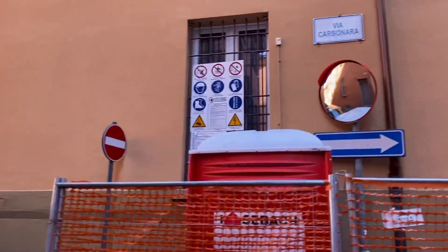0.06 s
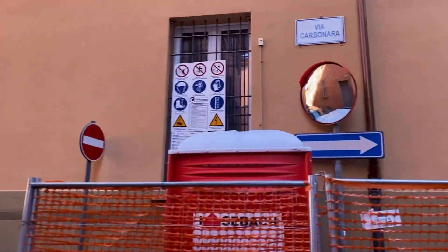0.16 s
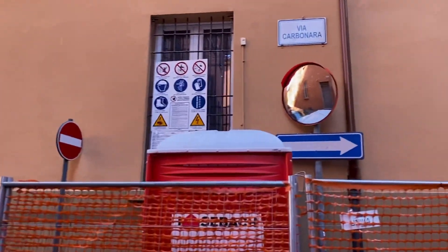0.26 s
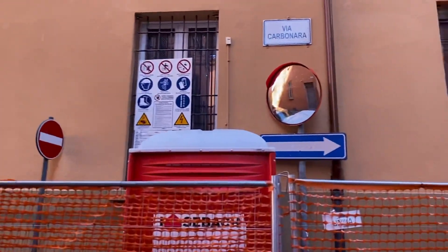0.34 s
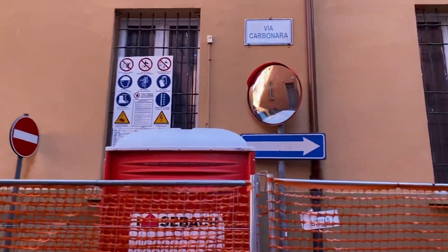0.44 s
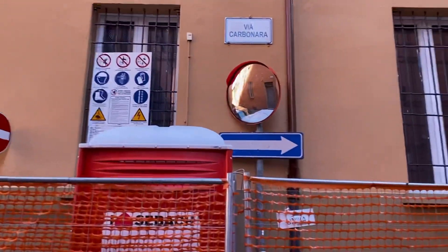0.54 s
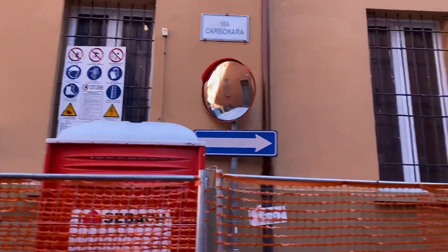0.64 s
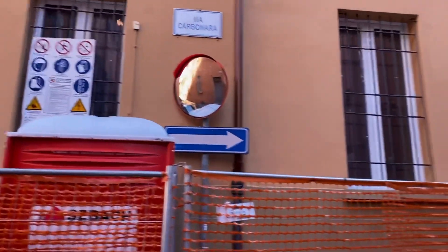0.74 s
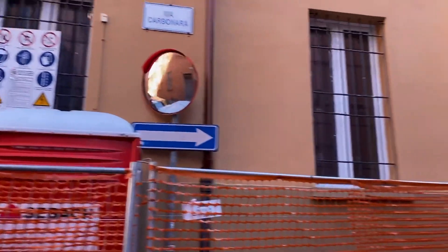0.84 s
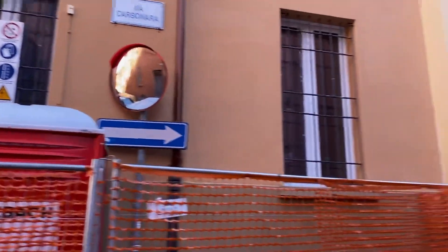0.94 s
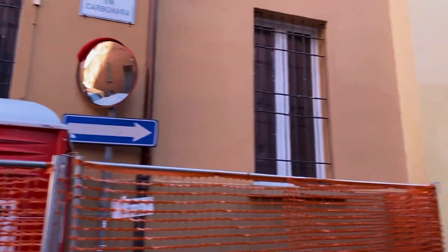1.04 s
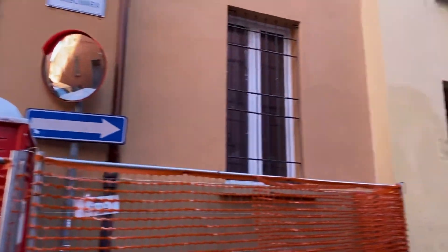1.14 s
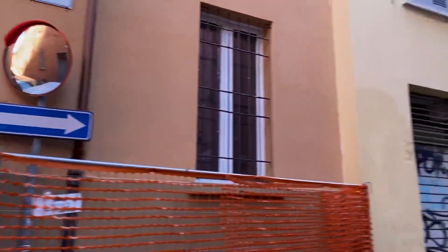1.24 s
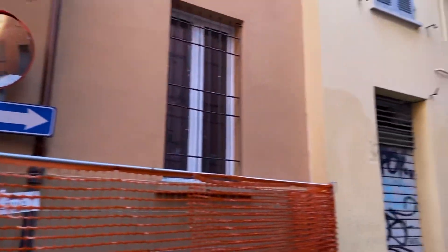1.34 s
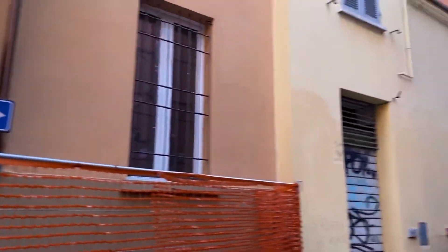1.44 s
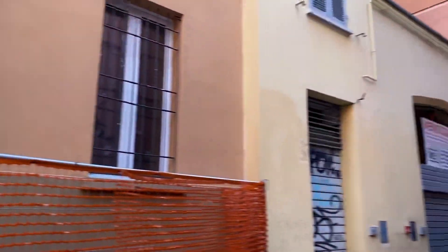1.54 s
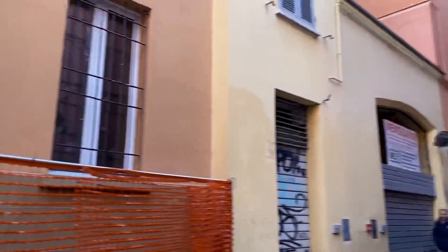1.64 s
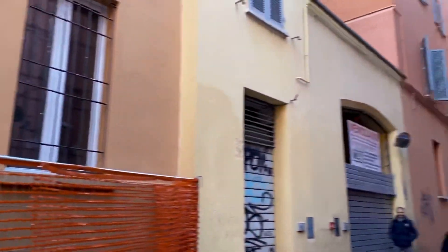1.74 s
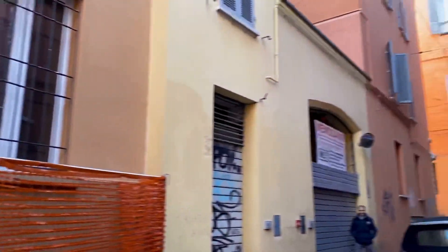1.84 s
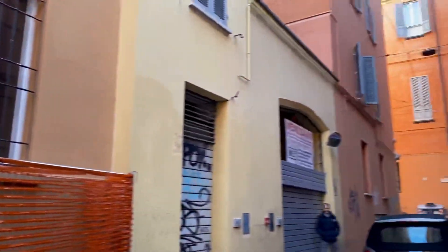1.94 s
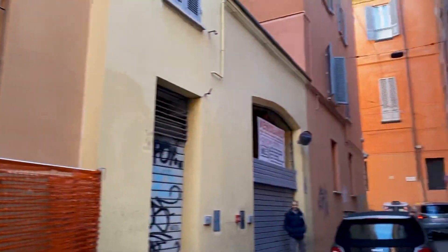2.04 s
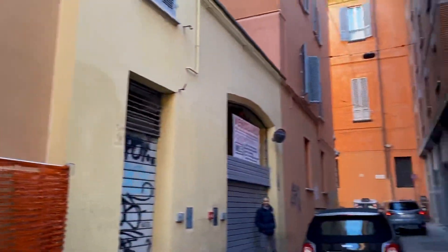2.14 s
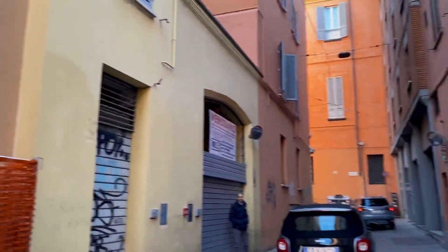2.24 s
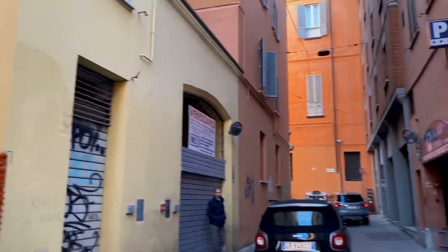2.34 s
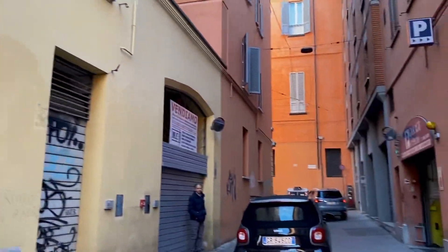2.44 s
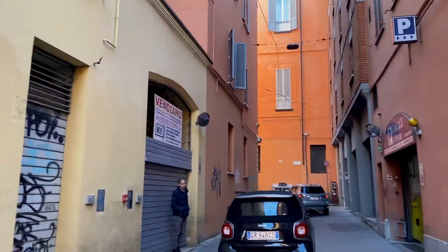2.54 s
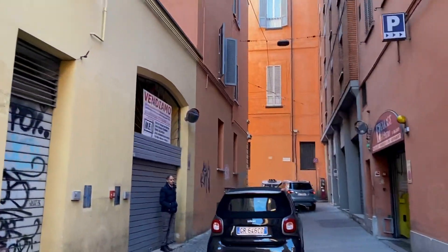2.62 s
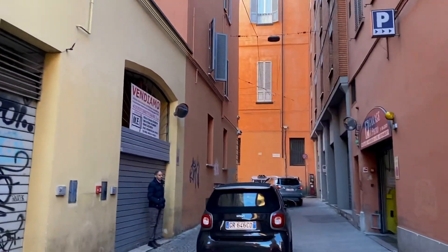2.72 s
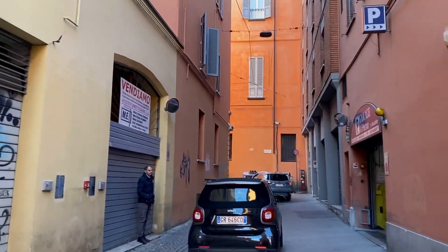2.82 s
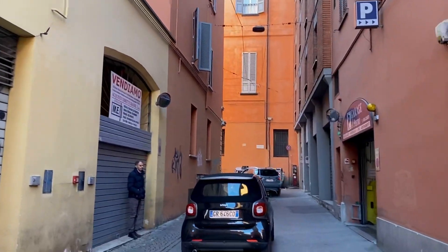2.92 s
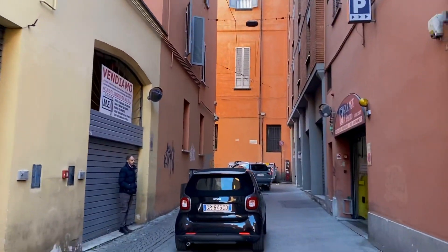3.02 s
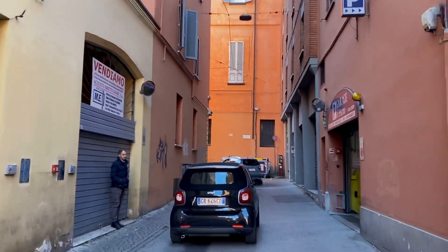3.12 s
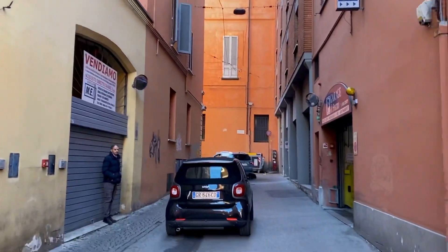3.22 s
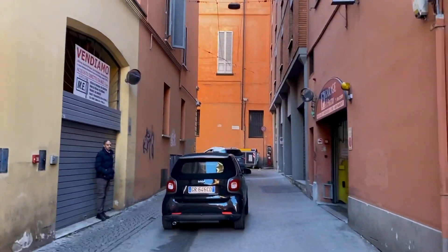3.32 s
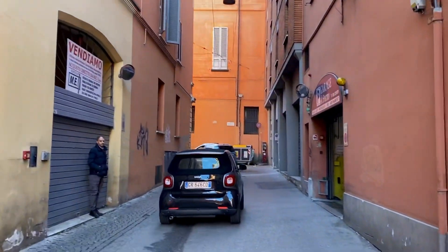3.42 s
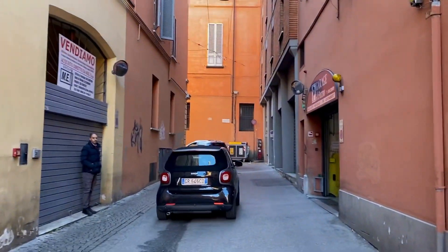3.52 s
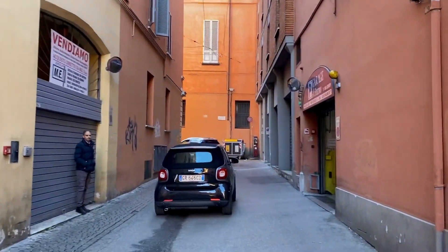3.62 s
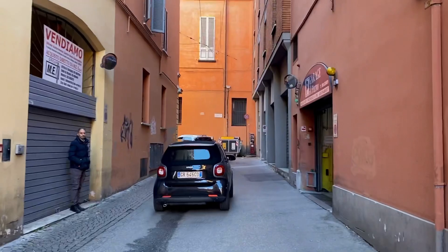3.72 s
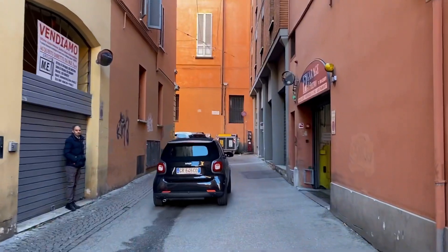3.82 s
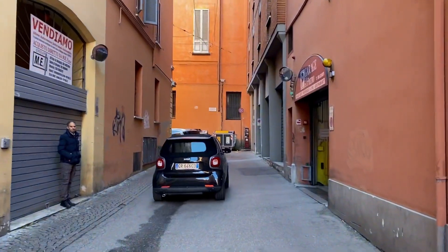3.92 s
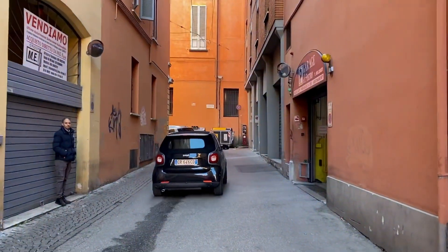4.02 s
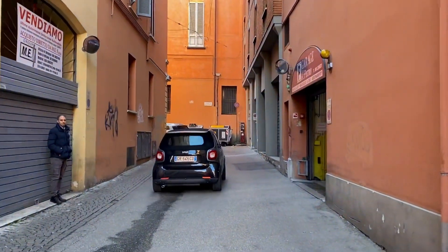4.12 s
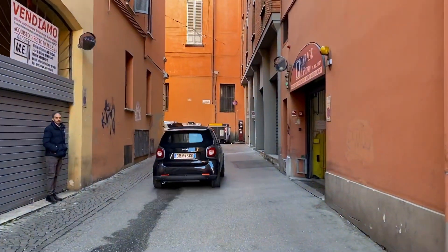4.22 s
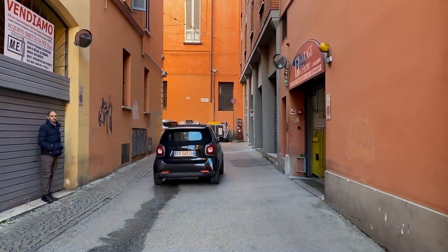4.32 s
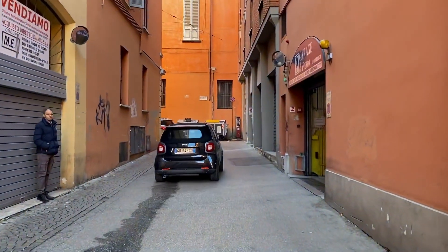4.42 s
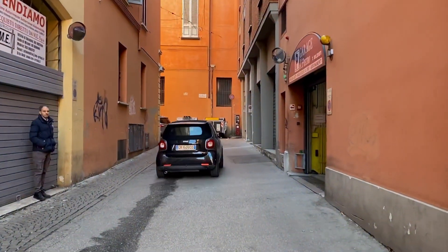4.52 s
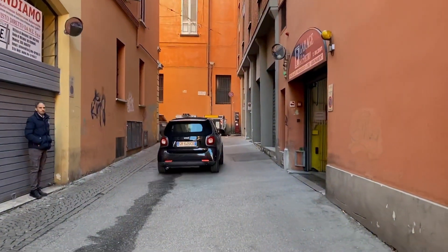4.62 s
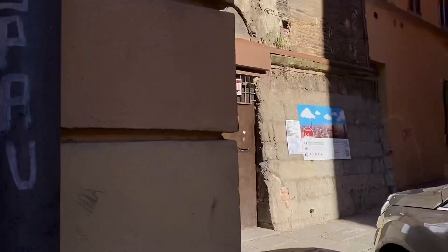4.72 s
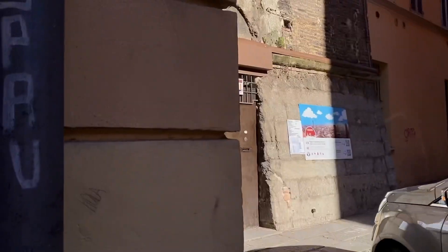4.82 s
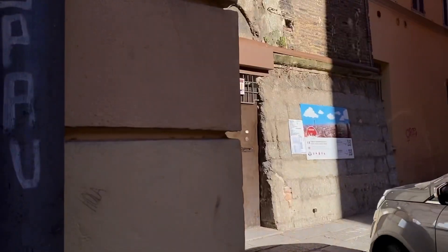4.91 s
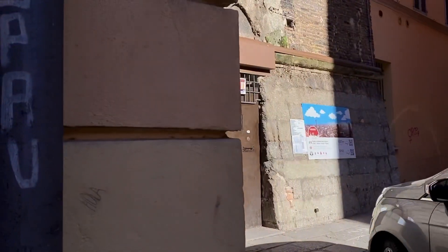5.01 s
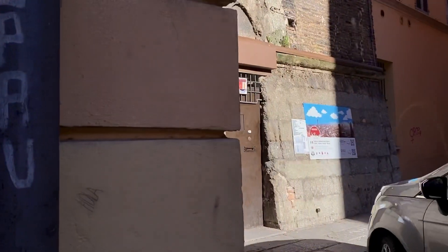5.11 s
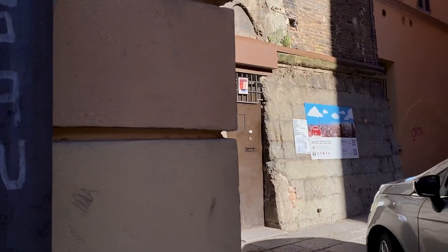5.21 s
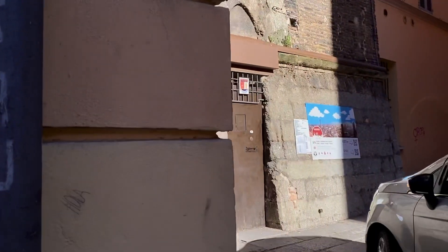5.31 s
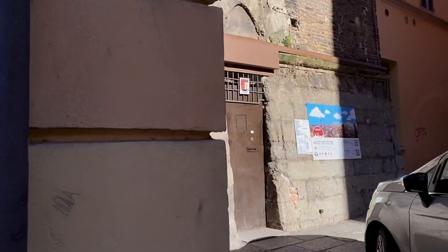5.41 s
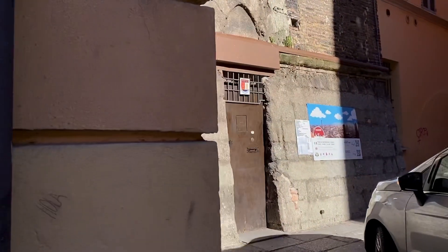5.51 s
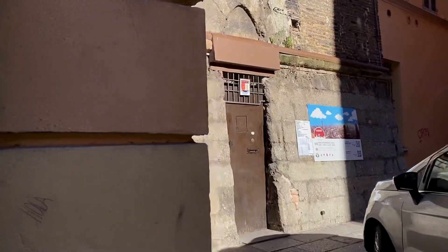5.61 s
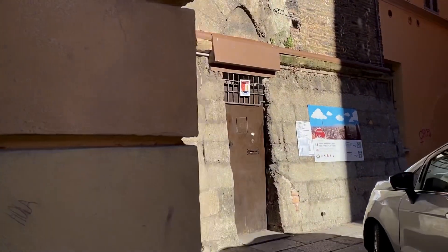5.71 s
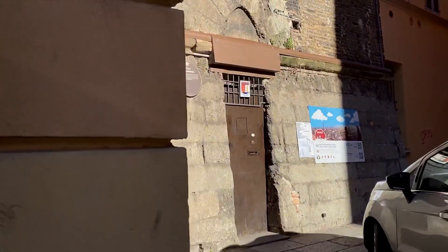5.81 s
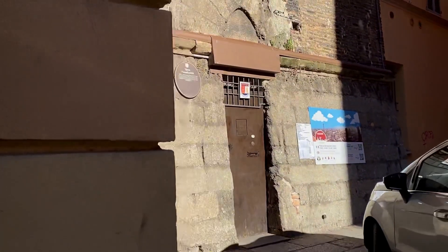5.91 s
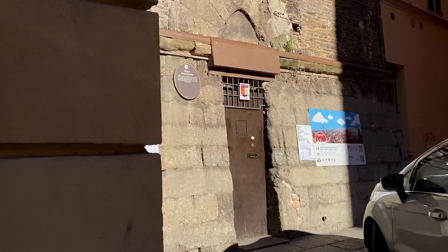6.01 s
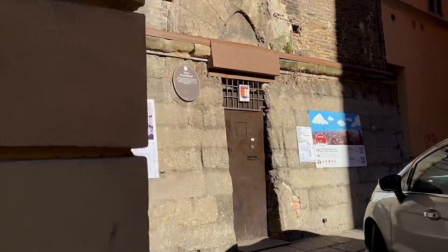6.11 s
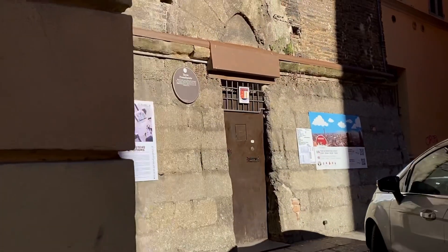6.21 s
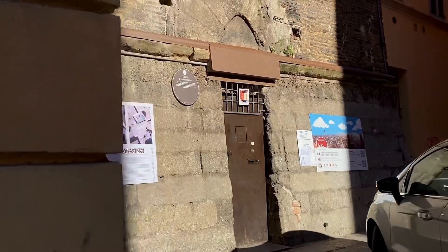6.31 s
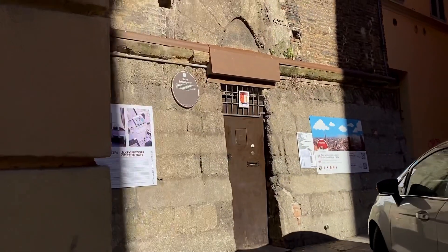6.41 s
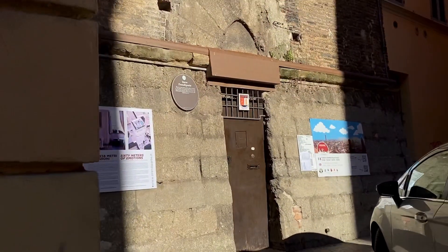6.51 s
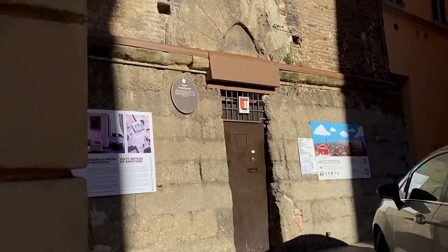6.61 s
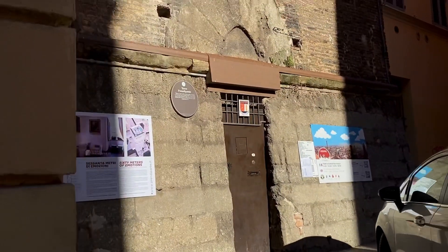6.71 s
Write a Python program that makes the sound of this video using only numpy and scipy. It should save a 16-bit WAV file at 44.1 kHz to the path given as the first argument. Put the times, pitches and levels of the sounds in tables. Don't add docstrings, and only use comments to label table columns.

```python
import sys
import numpy as np
from scipy import signal
from scipy.fft import rfft, irfft, next_fast_len
from scipy.io import wavfile
from scipy.ndimage import uniform_filter1d

SR = 44100
rng = np.random.default_rng(int(sys.argv[2]) if len(sys.argv) > 2 else 0)


def gain_from_decibels(decibels):
    exponent = np.asarray(decibels, float) / 20
    return 10 ** exponent


def wrap_up_sound(samples):
    columns = np.atleast_2d(samples).T
    tamed = np.clip(columns, -1, 1)
    steps = np.round(tamed * 32767).astype(np.int16)
    wavfile.write(sys.argv[1], SR, steps)


N = 297675
t = np.arange(N) / SR
BOTH_SIDES = np.array([[1], [-1]])

CUT_S, FADE_OUT_S, FADE_IN_S = 4.748, 0.0054, 0.013
MEAN_LOAD_DB, LOAD_LAG_S = -30, 0.4

# (time [s], firing cycle [Hz], load as level of order 2 [dB])
LANE_ENGINE = [(0.0, 23.13, -35), (0.24, 22.66, -50), (0.4, 22.3, -35.5), (0.61, 21.53, -32.5),
               (0.73, 22.27, -37), (1.24, 24.2, -31.5), (1.53, 27.15, -27.5), (1.8, 32.02, -24),
               (1.95, 34.63, -25), (2.14, 35.37, -24.5), (2.87, 35.03, -25), (3.17, 36.13, -24.5),
               (3.49, 35.99, -21), (3.7, 36.44, -27.5), (4.15, 40.84, -33), (4.35, 41.98, -41.5),
               (4.55, 43.27, -45), (4.75, 41.06, -55)]
CORNER_ENGINE = [(4.751, 41.36, -33.5), (4.94, 39.17, -33.5), (5.11, 36.6, -40.5), (5.281, 34.37, -29),
                 (5.501, 31.4, -36.5), (5.711, 25.58, -32), (5.94, 22.77, -38), (6.2, 21.53, -42.5),
                 (6.75, 22.29, -52.5)]
# (multiple of cycle, level [dB], share of load swing, gain as the pipe tunes in [dB/Hz])
LANE_STRONG = [(1, -36, -0.055, 0.69), (2, -30, 1.0, 0.0), (4, -51.5, 0.53, -0.1)]
CORNER_STRONG = [(2, -30.5, 1, 0.43), (3, -34.5, 0.73, -0.013), (4, -38, 0.81, -0.46)]
# (multiple of cycle, level over the street drone [dB])
LANE_WEAK = [(3, -13), (5, -15.5), (6, -12), (7, -15), (8, -17), (11, -24)]
CORNER_WEAK = [(1, -14), (5, -17.5), (6, -16.5), (7, -13.5)]
# (time [s], peak level [dB], end pitch [Hz], length [s])
KNOCKS = [
    (3.3305, -22, 250, .0075),
    (4.0305, -18, 290, .0072),
    (4.7043, -21, 290, .0095),
    (4.8712, -15, 200, .005),
]
# (pitch [Hz], level [dB], time to fall 60 dB [s], delay [s])
COVER_RINGS = [
    (84.5, -3.5, 0.2, .008),
    (164, 0, 0.075, .006),
    (517, 0, .12, 0.0033),
    (734, -6, 0.021, 0.0066),
]
# (delay [s], level [dB])
WALL_ECHOES = [
    (0.0137, -4),
    (.020, -11),
    (.032, -11),
    (0.063, -20),
]
# (time [s], peak level [dB])
LOUD_TICKS = [(2.4399, -52), (2.9216, -45), (3.0072, -48), (3.205, -48), (3.4555, -52), (3.5369, -49),
              (3.6233, -46), (3.6758, -45), (3.8693, -48), (4.2446, -48), (4.3623, -47), (5.0976, -49),
              (5.1814, -50)]
# (start [s], end [s], start pitch [Hz], end pitch [Hz], level [dB])
WHINES = [(1.0, 1.55, 238, 272, -44), (1.0, 1.6, 340, 375, -47), (1.4, 3.2, 445, 432, -44),
          (3.5, 4.75, 434, 445, -44), (1.55, 1.75, 2310, 2300, -50), (1.88, 2.0, 2300, 2290, -47),
          (.6, 1.05, 2800, 2800, -60), (2.6, 3.08, 80, 104, -37), (0, 2.3, 1250, 1270, -59),
          (0, .25, 1010, 1010, -51), (6.25, 6.75, 935, 935, -53), (6.0, 6.75, 540, 510, -51),
          (1.35, 2.3, 1330, 1320, -53), (4.05, 4.7, 372, 385, -52), (-.3, 1.2, 94, 89, -42),
          (3.45, 3.7, 2340, 2320, -53), (2.0, 3.0, 392, 385, -52)]
# (start [s], end [s], start pitch [Hz], end pitch [Hz], level [dB])
SWELLS = [(0, 2.4, 4700, 4650, -57), (4.18, 4.4, 2300, 2330, -48), (5.05, 5.6, 2500, 2350, -45),
          (4.77, 5.4, 1400, 1300, -44), (4.76, 5.5, 4650, 4450, -52), (5.65, 6.25, 810, 720, -43),
          (5.4, 6.3, 250, 215, -43), (1.3, 1.9, 3020, 3050, -59)]
# (time [s], level [dB])
LANE_NEAR = [(0.0, -5), (0.9, -4), (1.3, -3.5), (1.65, -0.5), (1.92, 1), (2.6, 0.34), (3.9, 0.5), (4.27, 3),
             (4.4, 1.5), (4.75, 3)]
CORNER_NEAR = [(4.75, 5), (5.1, 3.5), (5.5, 3), (5.75, 0.5), (6.1, -3), (6.4, -4), (6.75, -5)]
# (level [dB], share of nearness, share of engine load)
LANE_LAYERS = [
    (-32, 0.26, 0.042),
    (-38.5, 1.32, 0.0038),
    (-43, 1.03, -0.028),
    (-60.5, 0.79, 0.17),
]
CORNER_LAYERS = [
    (-28, 0.45, .05),
    (-36, 0.77, .01),
    (-40, 1.08, .01),
    (-59.5, 0.63, 0.032),
]
# (low edge [Hz], high edge [Hz])
LAYER_BANDS = [
    (30, 120),
    (160, 600),
    (800, 5000),
    (9800, 12200),
]
# (pitch [Hz], level per Hz [dB])
LANE_COLOUR = [(22, -10), (35, 3), (90, -0.5), (250, 5.5), (450, 9), (700, 7.5), (1250, 8), (1900, 6),
               (2350, 2), (3700, -7), (4600, -9), (5600, -12), (7200, -19), (11500, -27.5), (15500, -32)]
CORNER_COLOUR = [(22, -24), (45, 5.5), (110, 9.5), (250, 8.5), (500, 9), (750, 8), (1250, 9), (2000, 7.5),
                 (2600, 2), (3300, -4.5), (4500, -7), (5800, -13.5), (7400, -20.5), (11500, -27.5),
                 (15500, -34.5)]
# (pitch [Hz], shared part [0-1], left lead [turns], left over right [dB])
LANE_LIKENESS = [(40, 0.94, 0.033, 0.5), (170, 0.92, 0, -3), (350, 0.68, 0.055, -0.5),
                 (680, 0.58, 0.16, 2.5), (1220, 0.48, 0.17, 0.5), (1650, 0.04, 0.55, 1.5),
                 (2260, 0.8, 0.85, 0.5), (2740, 0.22, 0.97, .4), (3480, 0.4, 1.15, 2.5),
                 (4300, 0.4, 0.92, 1.2), (5450, 0.2, 1.32, 3), (6400, 0.8, 1.04, 0), (6900, 1, 0.996, 0.5)]
CORNER_LIKENESS = [(40, 0.96, 0.0076, 0.22), (170, 0.9, 0.13, -1.6), (350, 0.35, 0.001, -0.34),
                   (680, 0.17, 0.12, 2.9), (1160, 0.31, 0.47, 0.37), (1690, 0.42, 0.66, -1.5),
                   (2300, 0.53, 0.93, -0.25), (2760, 0.51, 1.13, 0.77), (3060, 0.11, 1.22, 0.23),
                   (4000, 0.72, 1.15, 0.85), (5530, .05, 0.79, 1.2), (6360, 0.47, 1.03, .1),
                   (7100, 0.96, 1.01, 0)]


def in_time(rows):
    s, *columns = np.transpose(rows)
    return [np.interp(t, s, column) for column in columns]


def at_hz(points, hz):
    known_hz, level_db = np.transpose(points)
    return np.interp(np.log(hz + 1), np.log(known_hz), level_db)


def drift(rate, span=slice(None)):
    r = np.exp(-2 * np.pi * rate * 40 / SR)
    slow = signal.lfilter([1], [1, -2 * r, r * r], rng.standard_normal(N // 40 + 2002))
    slow = slow[2000:]
    return np.interp(t[span] * SR / 40, np.arange(len(slow)), slow / slow.std())


def engine(table, strong, weak, drone_db, wobble, flicker_db, surge_db, surge_per_s):
    cycle_hz, load_db = in_time(table)
    phase = 2 * np.pi * np.cumsum(cycle_hz) / SR
    levels = []
    for (multiple, db, share, slope), surge in zip(strong, surge_db):
        choked_db = 2.5 * np.clip(32 - multiple * cycle_hz, 0, None)
        level = db + share * (load_db - MEAN_LOAD_DB) + slope * (cycle_hz - 35)
        levels.append(level - choked_db + surge * drift(surge_per_s))
    levels += [drone_db + db for multiple, db in weak]
    multiples = [round(row[0]) for row in strong + weak]
    out = 0
    for multiple, db in zip(multiples, levels):
        rough = multiple / 2
        flicker = flicker_db * (rough * drift(6) + abs(rough - 1) * drift(1.2))
        angle = multiple * phase + wobble * rough * drift(3) + 6.3 * rng.random()
        out = out + gain_from_decibels(db + flicker) * np.sin(angle)
    return np.sqrt(2) * out, phase


def knocks():
    direct = np.zeros(N)
    for s, db, end_hz, length in KNOCKS:
        age = t[:round(length * SR)]
        hz = end_hz + 520 * np.exp(-age / 0.0017)
        shape = (age / length) ** 0.22 * np.clip((length - age) / 0.0015, 0, 1)
        chirp = gain_from_decibels(db) * shape * np.sin(2 * np.pi * np.cumsum(hz) / SR)
        direct[round(s * SR):][:len(age)] += chirp
    cover_s, cover_db = 4.8662, -16.5
    age = t[:SR // 2]
    for hz, db, t60, delay in COVER_RINGS:
        ring = gain_from_decibels(cover_db + db - 60 * age / t60) * np.sin(2 * np.pi * hz * age)
        ring = ring * (1 - np.exp(-age / 0.00077))
        direct[round((cover_s + delay) * SR):][:len(age)] += ring

    def late(delay):
        return np.interp(t - delay, t, direct)

    left = late(0.00022) + sum(gain_from_decibels(db) * late(s * 0.93) for s, db in WALL_ECHOES)
    right = gain_from_decibels(0.5) * direct + sum(gain_from_decibels(db) * late(s) for s, db in WALL_ECHOES)
    return np.array([left, right])


def ticks(phase, hiss_db):
    first_phase = phase[round(LOUD_TICKS[1][0] * SR)]
    fired = np.flatnonzero(np.diff(np.floor((phase - first_phase) / (2 * np.pi))))
    chance_db = 2.5 * (rng.exponential(size=len(fired)) - 1)
    starts = np.zeros(N)
    starts[fired] = gain_from_decibels(hiss_db[fired] + 4 + chance_db)
    for s, db in LOUD_TICKS:
        starts[round(s * SR)] = gain_from_decibels(db)
    age = t[:3000] / 0.006
    size = signal.fftconvolve(starts, age * np.exp(1 - age))[:N]
    bright = signal.butter(2, [11200, 13100], "band", fs=SR, output="sos")
    return signal.sosfilt(bright, size * rng.standard_normal(N))


def whines():
    out = np.zeros((2, N))
    rows = [(row, 0.7 * np.sqrt(row[2])) for row in WHINES]
    rows += [(row, 0.08 * row[2]) for row in SWELLS]
    for (start, end, start_hz, end_hz, db), width_hz in rows:
        span = (t >= start) & (t < end)
        share = (t[span] - start) / (end - start)
        phase = 2 * np.pi * np.cumsum(start_hz + (end_hz - start_hz) * share) / SR
        wander = (drift(width_hz, span) + 1j * drift(width_hz, span)) / np.sqrt(2)
        blur = 4 / np.sqrt(width_hz + 100) + wander
        swell = gain_from_decibels(db) * np.sqrt(np.sin(np.pi * share))
        angle = phase + np.pi * 0.15 * BOTH_SIDES
        out[:, span] += np.real(swell * blur * np.exp(1j * angle))
    return out


def layer_levels(near, table, layers):
    load = uniform_filter1d(in_time(table)[1], round(LOAD_LAG_S * SR)) - MEAN_LOAD_DB
    near_db = in_time(near)[0]
    return [db + near_share * near_db + load_share * load for db, near_share, load_share in layers]


def street(levels, colour, likeness, phase, span, patchy_db, throb_db, wall_share):
    n = span.stop - span.start
    size = next_fast_len(n)
    hz = np.fft.rfftfreq(size, 1 / SR)
    colour_db = at_hz(colour, hz)
    mid, side = rfft(rng.standard_normal((2, size))) * gain_from_decibels(colour_db)
    known_hz, *columns = np.transpose(likeness)
    alike, turns, pan_db = [np.interp(hz, known_hz, column) for column in columns]
    alike = np.clip(alike, 0, 0.995)
    pair = np.sqrt((1 + alike) / 2) * mid + np.sqrt((1 - alike) / 2) * side * BOTH_SIDES
    pair = pair * np.exp(1j * np.pi * turns * BOTH_SIDES) * gain_from_decibels(pan_db * BOTH_SIDES / 2)
    lags = rng.uniform(0.001998, 0.022, (10, 1))
    bounces = np.exp(-2j * np.pi * hz * lags).sum(axis=0)
    pair = pair * (1 + wall_share * bounces) / np.sqrt(1 + 10 * wall_share ** 2)
    power = gain_from_decibels(2 * colour_db) / len(hz)
    lifts = []
    for db, (low, high) in zip(levels, LAYER_BANDS):
        lifts.append(db[span] - 10 * np.log10(power[(hz > low) & (hz < high)].sum() * 2))
    places = np.log2(np.sqrt(np.prod(LAYER_BANDS, axis=1)))
    out, together, firing = 0, drift(18, span), np.cos(phase[span]) ** 2
    for octave in np.arange(4.5, 14.6, 0.5):
        window = np.clip(1 - np.abs(np.log2(hz + 1) - octave) * 2, 0, 1)
        db = sum(np.interp(octave, places, np.eye(4)[k]) * lift for k, lift in enumerate(lifts))
        bright = np.clip((octave - 8.5) / 4.4, 0.1, 1)
        bright = bright * (1 + 0.72 * (octave > 13.7))
        db = db + patchy_db * bright * (0.34 * together + drift(18, span))
        db = db + throb_db * bright * (firing - 0.5)
        out = out + gain_from_decibels(db) * irfft(pair * window, size)[:, :n]
    return np.pad(out, ((0, 0), (span.start, N - span.stop)))


def scene():
    cut, before = round(CUT_S * SR), t < CUT_S
    lane_db = layer_levels(LANE_NEAR, LANE_ENGINE, LANE_LAYERS)
    corner_db = layer_levels(CORNER_NEAR, CORNER_ENGINE, CORNER_LAYERS)
    first, first_phase = engine(LANE_ENGINE, LANE_STRONG, LANE_WEAK, lane_db[1],
                                wobble=0.15, flicker_db=0.6, surge_db=(2, 0.3, 5), surge_per_s=2)
    second, second_phase = engine(CORNER_ENGINE, CORNER_STRONG, CORNER_WEAK, corner_db[1],
                                  wobble=0.45, flicker_db=0.8, surge_db=(3, 5, 6), surge_per_s=8)
    lane = first * gain_from_decibels(-0.15 * BOTH_SIDES)
    lane = lane + street(lane_db, LANE_COLOUR, LANE_LIKENESS, first_phase / 2, slice(0, cut),
                         patchy_db=0.96, throb_db=1.5, wall_share=0.086)
    corner = second * gain_from_decibels(0.1 * BOTH_SIDES)
    corner = corner + street(corner_db, CORNER_COLOUR, CORNER_LIKENESS, second_phase / 2, slice(cut, N),
                             patchy_db=1.67, throb_db=0.5, wall_share=0.11)
    tick = ticks(np.where(before, first_phase, second_phase), np.where(before, lane_db[3], corner_db[3]))
    fade = np.where(before, (CUT_S - t) / FADE_OUT_S, (t - CUT_S) / FADE_IN_S).clip(0.1, 1)
    return fade * (np.where(before, lane, corner) + whines() + knocks() + tick)


def band_limit(x):
    return signal.sosfilt(signal.butter(12, 16630, fs=SR, output="sos"), x)


def record(dry):
    port_hz, port_lag_s, top_hz = 6920, 1 / 4125, 15760
    size = next_fast_len(N)
    hz = np.fft.rfftfreq(size, 1 / SR)
    turn = np.exp(-1j * np.pi * port_lag_s * np.clip(hz - port_hz, 0, None) * BOTH_SIDES)
    turn *= (hz < top_hz) * np.clip(hz / 33, 0, 1) ** 5
    mix = irfft(rfft(dry, size) * turn, size)[:, :N]
    return band_limit(mix)


dry = scene()
out = record(dry)
wrap_up_sound(out)
```